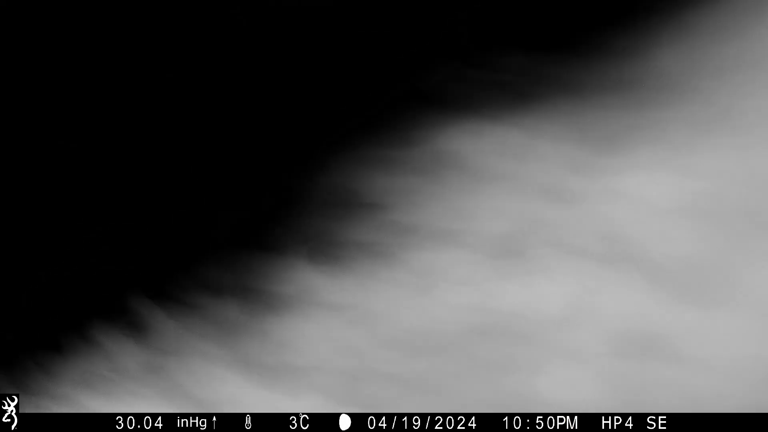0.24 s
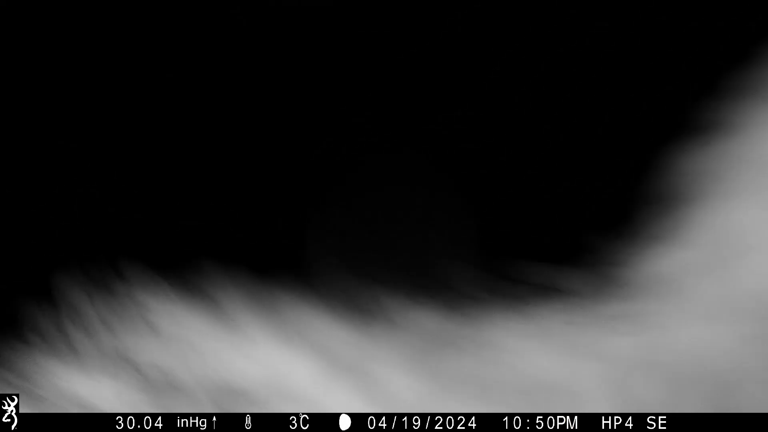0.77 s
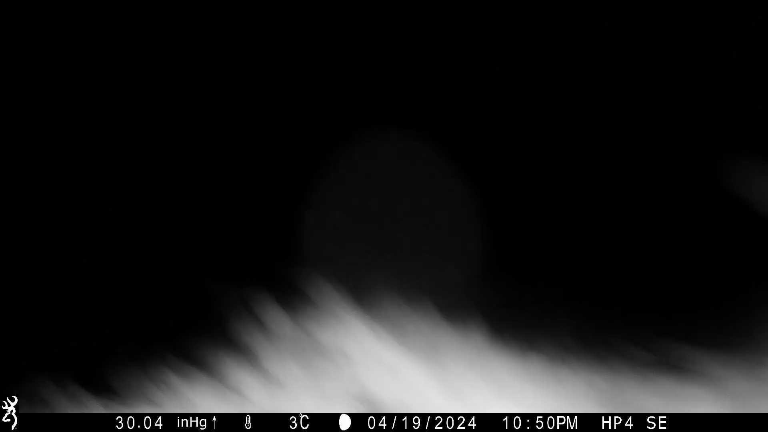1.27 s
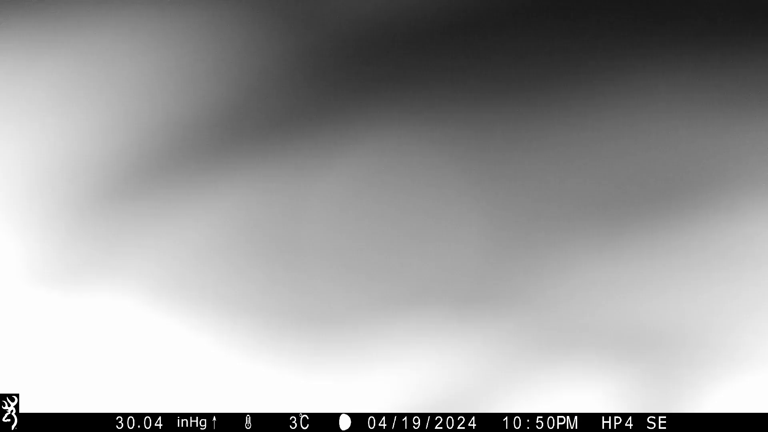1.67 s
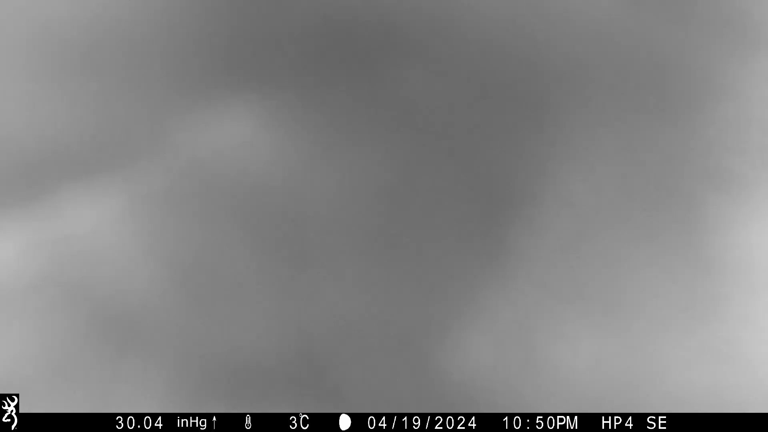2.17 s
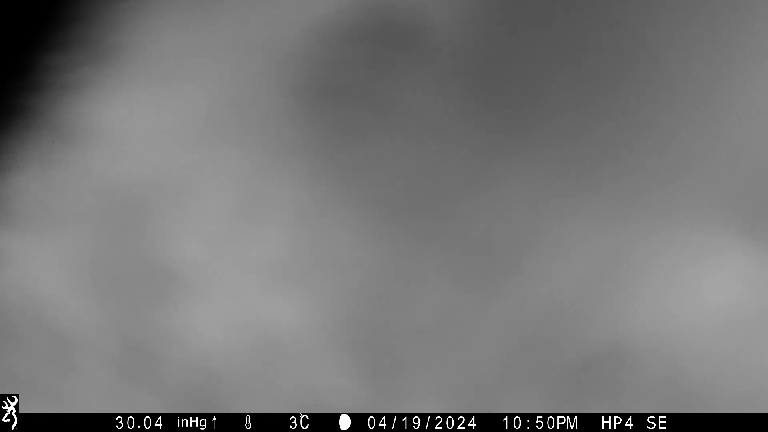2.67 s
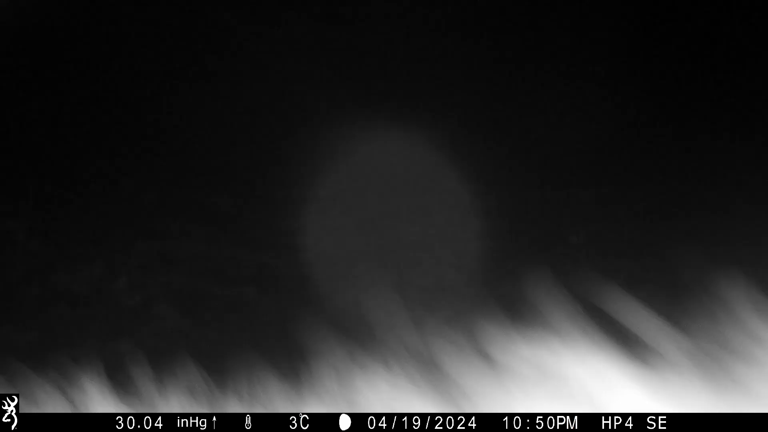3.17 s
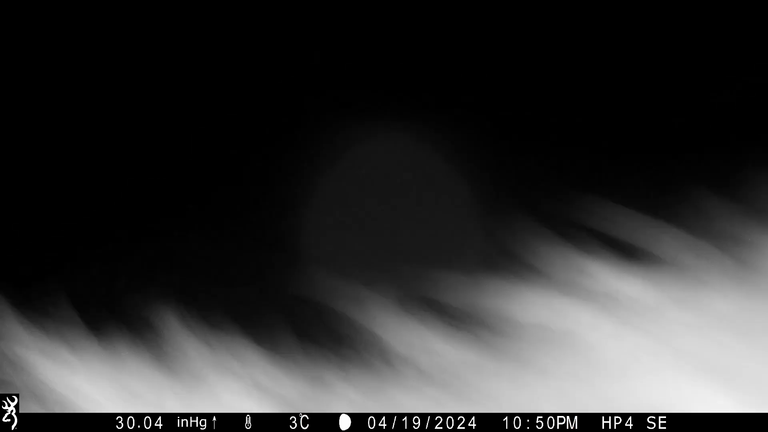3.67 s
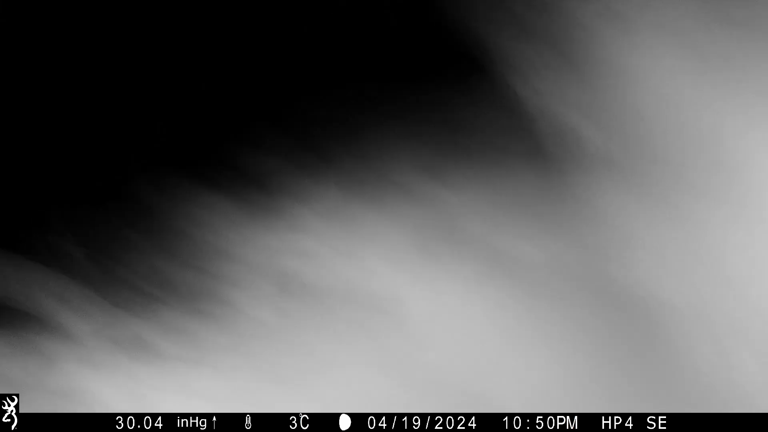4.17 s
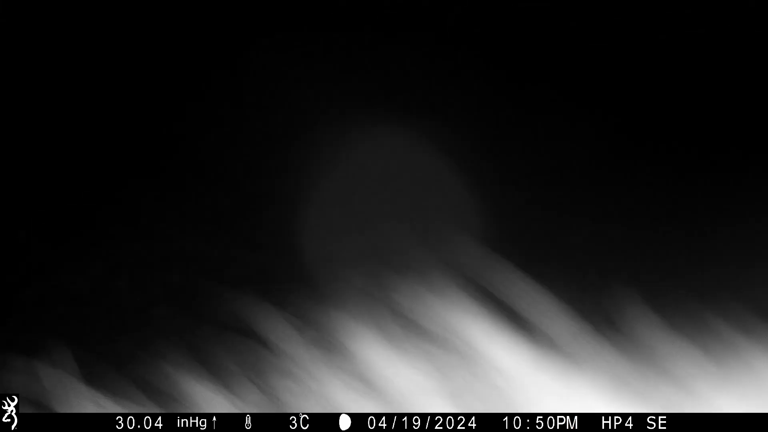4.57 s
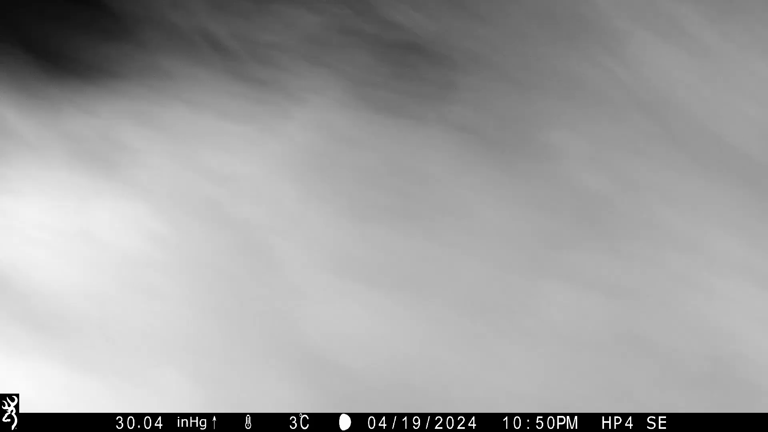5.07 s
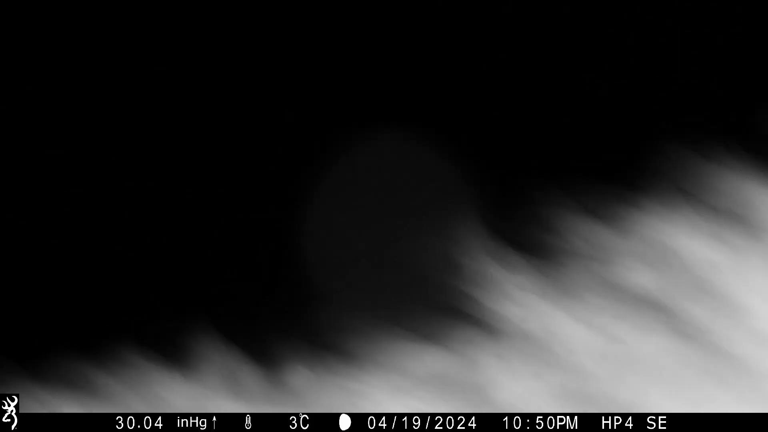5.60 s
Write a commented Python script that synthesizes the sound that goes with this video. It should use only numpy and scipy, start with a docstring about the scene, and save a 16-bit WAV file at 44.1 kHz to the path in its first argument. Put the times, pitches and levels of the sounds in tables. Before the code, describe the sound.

An animal brushes fur and dry leaves against a small boxed camera in a wood at night. A faint stir opens, then from 0.19 to 0.32 s a cluster of hard snaps and scrapes overloads the microphone, with a low bump at 0.24 s. Softer rubs follow at 0.5 to 0.75 s, then a lull. Contact resumes at 1.25 s; the densest cracking comes at 1.57 to 1.75 s, with strong scrapes and snaps near 2.0 to 2.25, 2.55, 2.8 and 2.9 s, thinning by 3.3 s. Small ticks and faint rubs lead to a swelling scrape with snaps at 4.15 to 4.25 s. Raspier strokes come at 4.8 to 5.1 s, then light rustles to the end. The grit rings nasally near 2 kHz, with duller leaf crush and fine fizz. Soft hush, low hum near 84 Hz and a very faint high whine remain underneath. Left channel only; right silent.

```python
"""An animal brushes through dry leaves and against a small boxed camera in a wood at night.
Snaps and scrapes from 0.19 s, a lull, the densest contact from 1.25 to 3.3 s, then looser strokes to the end.
Grit noise rings the sound port near 2 kHz; short bursts make the snaps, and the loudest overload the preamplifier.
Soft low bumps come through the mount; under all lie hush, a hum near 84 Hz and a faint high whine.
Only the left channel is wired."""
import sys
import numpy as np
from scipy import signal
from scipy.io import wavfile
from scipy.ndimage import uniform_filter1d

SR = 44100
rng = np.random.default_rng(int(sys.argv[2]) if len(sys.argv) > 2 else 0)


def master_out(mix):
    """Clip the mix to full scale and print it as 16-bit PCM to the path in sys.argv[1]."""
    frames = np.transpose(np.atleast_2d(mix))
    ceiling = np.clip(frames, -1, 1)
    pcm = np.round(ceiling * 32767).astype(np.int16)
    wavfile.write(sys.argv[1], SR, pcm)


N = 257544

# Source levels hold per input, ahead of the sum in record().
# Strokes. Each row: start in seconds, length in seconds, scrape level at the start in dB, swell by the end
# in dB, crush above the scrape in dB, fizz above the scrape in dB.
STROKES = [(0.237, 0.058, -33, -18, 1, -17.5), (0.301, 0.12, -48, 1.5, -17, -17.5),
           (0.541, 0.047, -45.5, -8.5, -14, -27), (0.602, 0.15, -68, 10.5, 2, -6),
           (1.249, 0.013, -55.5, 2, -8, -12), (1.35, 0.021, -44.5, -10, -23, -21),
           (1.502, 0.042, -49.5, -6.5, 0.5, -4.5), (1.575, 0.12, -33.5, -3, -13, -7),
           (1.713, 0.029, -33, -2.5, 2, -22), (1.879, 0.12, -47, 5.5, -4, -16),
           (2.007, 0.13, -47, 16, -9.5, -17), (2.169, 0.014, -30.5, -1, -17.5, -19.5),
           (2.204, 0.0037, -29.5, 2, -8, -11), (2.44, 0.1, -54, 20, -6.5, -24),
           (2.591, 0.027, -45.5, 5, -3, -15.5), (2.714, 0.048, -48, 10, -15, -23.5),
           (2.808, 0.025, -50, 4, 2, -16), (2.898, 0.054, -33.5, -14.5, -0.5, -22.5),
           (3.075, 0.074, -51, 14, -5, -32), (3.217, 0.008, -36.5, 2.5, -29, -37),
           (3.27, 0.013, -45, 8, -33, -24.5), (3.669, 0.032, -52.5, -6, -12, -19),
           (3.995, 0.043, -65, 3.5, 14, 7), (4.104, 0.01, -56, -9, 11.5, -29),
           (4.147, 0.11, -45, 15.5, 0.5, -23.5), (4.318, 0.054, -58.5, 0.5, 1, -13.5),
           (4.814, 0.085, -56.5, 13.5, 6, -5.5), (4.908, 0.097, -41, -8, 9.5, -7.5),
           (5.036, 0.088, -45.5, 6.5, -4, -12.5), (5.494, 0.14, -50.5, -1, -3, -8.5),
           (5.658, 0.076, -61, 4, 9, 5.5)]
# Faint stir of fur and leaves between strokes. Each row: time in seconds, ringing scrape level in dB,
# dull leaf crush level in dB, fine fizz level in dB.
STIR = [(0, -60.5, -53, -70.5), (.18, -53.5, -54, -65.5), (.45, -76, -66.5, -73.5), (1.3, -68, -65.5, -79),
        (1.8, -66, -59.5, -65), (2.6, -60, -54, -68), (2.7, -74, -58, -69), (2.95, -60, -48, -67),
        (3.33, -60, -53.5, -68), (3.55, -68, -61.5, -78), (4.3, -59.5, -58, -78.5),
        (4.78, -85, -55.5, -69.5), (5.15, -47.5, -48, -63), (5.45, -55, -54, -67.5), (5.84, -69, -66, -74)]
# How the fur lies on the port. Each row: time in seconds, shift of the ring as a factor,
# grit from 0 (smooth fur) to 1 (brittle leaves), rasp level in dB, low weight of the crush in dB.
CONTACT = [(.3, 1.055, 0.27, -4, -11.5), (1.6, 0.94, 0.52, -6.5, -8), (2.1, 1.017, 0.51, 0.5, -15),
           (3.3, 0.94, 0.53, 0, -12), (4.03, 0.97, 0.6, -1.5, -11), (4.15, 1.14, 0.67, 6.5, -37),
           (4.3, 0.95, 1, -1, -20), (4.88, 0.8, 0.4, 7, -9), (5.1, 1.03, 0.23, 2, -11),
           (5.84, 1.15, 0.22, -6.5, -13.5)]
# Port resonances, main ring first, then two side rings. Each row: frequency in Hz, width in Hz, gain in dB.
PORT_RINGS = [(1950, 330, 0), (1500, 500, -4), (2600, 700, -2)]
# Spectrum of crushed leaves. Each row: frequency in Hz, relative density in dB per Hz.
CRUSH_SPECTRUM = [(300, -38.5), (620, 1), (1000, 5.5), (2500, -1), (4000, -56)]
# Spectrum of fizz and snap ticks. Each row: frequency in Hz, relative density in dB per Hz.
FIZZ_SPECTRUM = [(2500, -12), (3300, -9), (4700, -7), (5650, 0), (6150, -6), (7200, -30), (15500, -41)]
# Snaps. Each row: time in seconds, ring peak in dB, ring frequency in Hz, tick level above that peak in dB
# (tick as rms over 7 ms), burst decay length in seconds.
SNAPS = [(0.189, -17.5, 2070, -35, 0.012), (0.195, -8.5, 1210, -35, 0.0053),
         (0.2001, -10.5, 944, -48, 0.003), (0.225, -24, 970, -30, 0.0011),
         (0.2405, -8.5, 1785, -27, 0.0039), (0.247, -13, 1850, -46, 0.0024),
         (0.253, -13, 1190, -21.5, 0.001), (0.279, -39, 1980, -6, 0.0022), (0.289, -43.5, 2000, -10, 0.002),
         (0.3015, -32, 1900, -12, 0.0026), (0.318, -46.5, 2300, -6.5, 0.0016),
         (1.448, -38, 2430, -24, 0.0011), (1.453, -27, 2760, -39.5, 0.0014),
         (1.47, -33, 2380, -28, 0.00074), (1.5711, -10.5, 1850, -35, 0.0026), (1.58, -13, 2180, -39, 0.011),
         (1.591, -16, 1670, -24, 0.0029), (1.595, -16, 1580, -17, 0.0045), (1.613, -19, 1650, -18, 0.002),
         (1.62, -10.5, 1630, -40, 0.0014), (1.6377, -13, 1820, -18, 0.0027),
         (1.659, -11, 1850, -32, 0.0054), (1.709, -13, 2890, -30.5, 0.00089),
         (1.719, -15, 2060, -21, 0.005), (1.729, -15, 2230, -22.5, 0.001), (1.746, -14, 1830, -32, 0.0016),
         (1.875, -35, 2240, -23, 0.0035), (1.951, -28.5, 2700, -25, 0.0021),
         (1.975, -19, 1900, -24.5, 0.00084), (2.095, -26, 2350, -23, 0.0073),
         (2.099, -38, 2230, -6, 0.0028), (2.126, -13, 1920, -28, 0.0022), (2.137, -32, 1800, -25, 0.0017),
         (2.223, -13, 1940, -22, 0.0033), (2.243, -24.5, 2240, -14, 0.0043),
         (2.355, -29.5, 2000, -29.5, 0.0025), (2.543, -14, 1795, -36, 0.0016),
         (2.5803, -17.5, 2000, -18.5, 0.0013), (2.77, -13, 1840, -34.5, 0.0024),
         (2.91, -20, 1770, -45, 0.0054), (3.436, -39.5, 990, -14, 0.0057),
         (3.737, -34, 2960, -20.5, 0.00078), (3.96, -36.5, 910, -29.5, 0.0062),
         (4.132, -40, 3000, -27, 0.00056), (4.19, -22, 2290, -35, 0.006), (4.212, -20, 2020, -31, 0.007),
         (4.234, -23, 2240, -32, 0.0038), (4.25, -23.5, 1960, -48, 0.0074), (4.868, -22, 1080, -43, 0.0011),
         (4.995, -23.5, 2350, -19, 0.00082), (5.053, -42, 1320, -2.5, 0.002),
         (5.081, -33.5, 2970, -12.5, 0.0048), (5.264, -34.5, 1870, -12.5, 0.0015)]
# Low bumps through the mount. Each row: start in seconds, peak in dB, frequency in Hz, time scale in seconds.
BUMPS = [(.24, -36, 128, 0.013), (2.53, -49, 101, 0.043), (2.544, -27, 310, 0.002),
         (2.9, -53.5, 151, 0.055), (3.92, -57, 123, 0.014), (4.557, -67.5, 145, 0.099),
         (4.865, -58, 59.8, 0.03)]
# Spectrum of the hush. Each row: frequency in Hz, relative density in dB per Hz.
HUSH_SPECTRUM = [(25, -34.5), (81, -7), (141, -12.5), (702, -6.5), (1250, 2.5), (2120, -6.5), (3060, -41.5),
                 (5740, -49.5), (7270, -40.5), (16000, -77)]
# Level of the hush. Each row: time in seconds, level in dB.
HUSH_LEVEL = [(0, -62), (1, -61), (3, -58.5), (5.84, -55.5)]
# Level of the hum. Each row: time in seconds, level in dB.
HUM_LEVEL = [(0, -80.5), (4.4, -94), (4.6, -76), (5.84, -81)]

ATTACK_DB_PER_S, RELEASE_DB_PER_S = 2301, 849
WANDER_FACTOR, WANDER_S = .07, .008  # drift of the ring, scaled by the grit
RASP_FOLLOWS_SCRAPE = 0.39  # rasp level lies between fizz (0) and scrape (1)
WHINE_HZ, WHINE_DB = 7800, -102
LIMIT = .36  # amplitude scale of the preamplifier overload
EDGE_HZ = 15900


def rubbing():
    """Fur and leaves drag past: grit rings the port, crushes leaves and fizzes."""
    scraping, crushing, fizzing = pressure()
    when_s, *contact = np.transpose(CONTACT)
    shift, harsh, rasp_db, weight_db = (np.interp(np.arange(N) / SR, when_s, c) for c in contact)
    rasping = amp(rasp_db) * fizzing * (scraping / fizzing) ** RASP_FOLLOWS_SCRAPE

    drift, rasp_drift = (evened(smoothed(z, WANDER_S)) for z in rng.standard_normal((2, N)))
    shift = shift * (1 + WANDER_FACTOR * harsh * drift)

    # partly shared grit ties the four layers together
    shared = grit(harsh, 4000, spread_db=1.0, clump_db=9.0, clump_s=0.0043)

    def driven(level):
        """Shared and private grit at the given level."""
        private = grit(harsh, 8000, spread_db=-2.5, clump_db=10.0, clump_s=0.0085)
        return (0.67 * shared + 0.63 * private) * level

    ring, crush, fizz, rasp = (driven(level) for level in (scraping, crushing, fizzing, rasping))

    main, *sides = (amp(db) * resonate(ring, hz * shift, width_hz) for hz, width_hz, db in PORT_RINGS)
    out = main - harsh * sum(sides)  # smooth fur whistles in one band, brittle leaves spread wider
    out += resonate(rasp, 3400 + 550 * rasp_drift, 1800)  # stiff edges rasp above the ring at a drifting pitch
    out += resonate(crush * amp(weight_db), np.full(N, 480.), 330)  # heavier leaning adds low weight
    out = signal.lfilter(*signal.butter(4, 6000, fs=SR), out)  # dulls the resonances only
    out += signal.oaconvolve(crush, kernel(CRUSH_SPECTRUM))[:N]
    return out + signal.oaconvolve(fizz, kernel(FIZZ_SPECTRUM))[:N]


def pressure():
    """Levels of scrape, crush and fizz: every stroke sets in fast, swells or fades, and lets go."""
    t = np.arange(N) / SR
    when_s, *stir_db = np.transpose(STIR)
    power = np.array([amp(np.interp(t, when_s, db)) ** 2 for db in stir_db])
    for start_s, length_s, db, swell_db, crush_db, fizz_db in STROKES:
        first = max(round((start_s - .1) * SR), 0)
        near = slice(first, round((start_s + length_s + .25) * SR))
        u = t[near] - start_s
        attack_db = ATTACK_DB_PER_S * np.minimum(u, 0)
        release_db = -RELEASE_DB_PER_S * np.maximum(u - length_s, 0)
        shape = amp(db + swell_db * np.clip(u / length_s, 0, 1) + attack_db + release_db)
        power[:, near] += (shape * amp([[0], [crush_db], [fizz_db]])) ** 2
    return np.sqrt(power)


def grit(harsh, per_s, spread_db, clump_db, clump_s):
    """Clicks that come in clumps; the harsher the contact, the more uneven."""
    clicks = rng.standard_normal(N) * (rng.random(N) < per_s / SR)
    sizes_db = spread_db * np.minimum(rng.exponential(1, N), 4)
    clumps_db = clump_db * evened(smoothed(rng.standard_normal(N), clump_s))
    x = clicks * amp(harsh * (sizes_db + clumps_db))
    return x / np.sqrt(uniform_filter1d(x ** 2, 2500) + 1e-12)  # holds the slow rms at 1


def snaps():
    """Each snap is a short noise burst that rings one main pitch and a lower one, with a sharp tick."""
    t = np.arange(1500) / SR
    noise = rng.standard_normal((len(SNAPS), 2, len(t)))
    tick_taps = kernel(FIZZ_SPECTRUM)
    size = len(tick_taps)
    out = np.zeros(N + 8000)
    for (start_s, db, hz, tick_db, length_s), (ring_noise, tick_noise) in zip(SNAPS, noise):
        rise = np.minimum(t / (0.26 * length_s), 1)
        burst = rise * np.exp(-(t / length_s) ** 0.88)
        # the shorter the snap, the wider its ring
        modes = mode(hz, 120 + .5 / length_s, size) + .5 * mode(hz * 0.62, 637, size)
        ring = np.convolve(ring_noise * burst, modes)
        tick = np.convolve(tick_noise * burst, tick_taps)
        tick *= np.sqrt(.007 * SR) / np.linalg.norm(tick)  # rms 1 over 7 ms
        at = round(start_s * SR)
        out[at:at + len(ring)] += amp(db) * (ring / abs(ring).max() + amp(tick_db) * tick)
    return out[:N]


def bumps():
    """The mount sways at a low pitch that swells and dies."""
    t = np.arange(N) / SR
    out = np.zeros(N)
    for start_s, db, hz, length_s in BUMPS:
        u = np.maximum(t - start_s, 0) / length_s
        envelope = np.e * 2 * u * np.exp(-2 * u)  # peaks at 1
        out += amp(db) * envelope * np.sin(2 * np.pi * hz * (t - start_s))
    return out


def night():
    """Hush of the wood and the electronics as shaped noise; hum and whine as narrow noise bands."""
    t = np.arange(N) / SR
    hush = signal.oaconvolve(rng.standard_normal(N + 8192), kernel(HUSH_SPECTRUM, size=8192), "valid")[:N]
    hush *= amp(np.interp(t, *np.transpose(HUSH_LEVEL)))
    hum = resonate(rng.standard_normal(N), np.full(N, 84.), 21)
    hum *= amp(np.interp(t, *np.transpose(HUM_LEVEL)))
    whine = amp(WHINE_DB) * resonate(rng.standard_normal(N), np.full(N, float(WHINE_HZ)), 110)
    return hush + hum + whine


def resonate(x, hz, width_hz):
    """Shifts the curve hz down to zero, smooths twice, and shifts back; noise keeps its rms."""
    turn = np.exp(2j * np.pi * np.cumsum(hz) / SR)
    r = np.exp(-np.pi * width_hz / SR)
    gain = np.sqrt(2 * (1 - r * r) ** 3 / (1 + r * r))
    return gain * (turn * signal.lfilter([1], [1, -2 * r, r * r], x / turn)).real


def mode(hz, width_hz, size):
    """A dying sine that swells over its first cycle."""
    t = np.arange(size) / SR
    swell = np.sin(np.pi / 2 * np.minimum(t * hz, 1)) ** 2
    return swell * np.exp(-np.pi * width_hz * t) * np.sin(2 * np.pi * hz * t)


def kernel(points, size=2048):
    """Causal minimum-phase filter of energy 1 from a (Hz, dB) spectrum that falls away beyond its ends."""
    f, db = np.transpose(points)
    hz = abs(np.fft.fftfreq(size, 1 / SR)) + 1
    edge_hz, edge_db = np.r_[1, f, SR], np.r_[-90, db, db[-1] - 30]
    log_gain = np.log(amp(np.interp(np.log(hz), np.log(edge_hz), edge_db)))
    taps = np.fft.ifft(np.exp(np.conj(signal.hilbert(log_gain)))).real
    return taps / np.linalg.norm(taps)


def smoothed(x, length_s):
    """Two running means of the given length."""
    width = max(int(length_s * SR), 2)
    return uniform_filter1d(uniform_filter1d(x, width), width)


def evened(x):
    """Scaled to rms 1."""
    return x / np.sqrt(np.mean(x ** 2) + 1e-20)


def amp(db):
    """Gain from dB."""
    return 10 ** (np.asarray(db) / 20)


def scene():
    """All sources reach the one microphone, which feeds two equal inputs."""
    sound = rubbing() + snaps() + bumps() + night()
    return np.array([sound, sound])


def record(dry):
    """Both inputs are summed into the left channel, which clips a little one-sidedly; then the band limit."""
    left = dry.sum(0) / LIMIT
    left = left / (1 + abs(left) ** 16) ** (1 / 16)
    left = LIMIT * (left - .1 * abs(left) ** 4)  # lopsided gain gives loud snaps a thud and extra treble
    left = signal.lfilter(*signal.butter(2, 28, "high", fs=SR), left)
    left = signal.oaconvolve(left, signal.firwin(511, EDGE_HZ, window=("kaiser", 9), fs=SR), "same")
    return np.array([left, 0 * left])


dry = scene()
out = record(dry)
master_out(out)
```